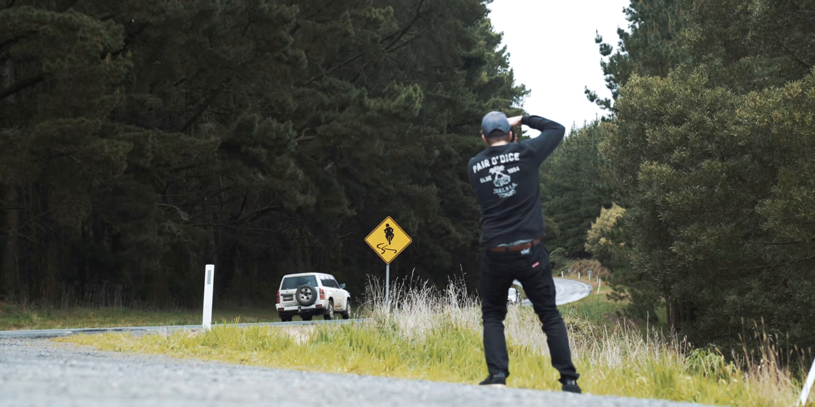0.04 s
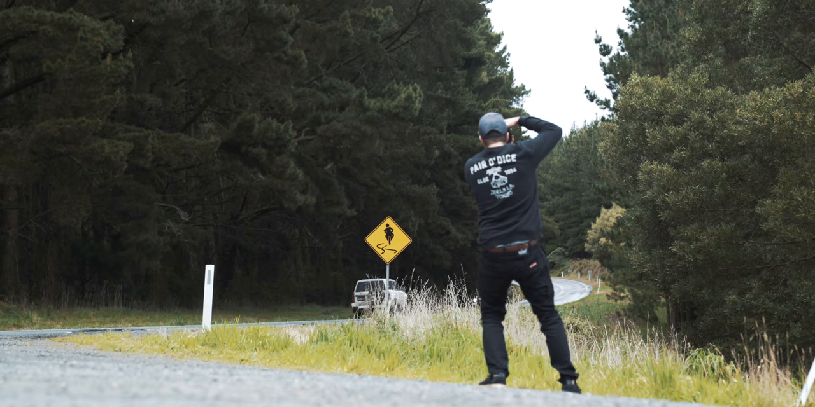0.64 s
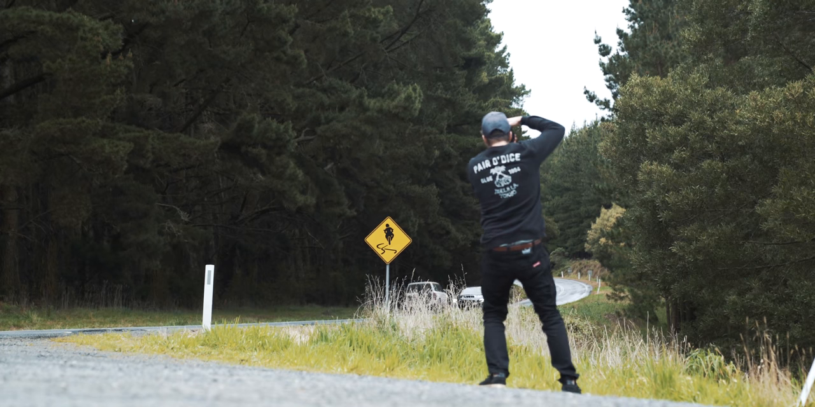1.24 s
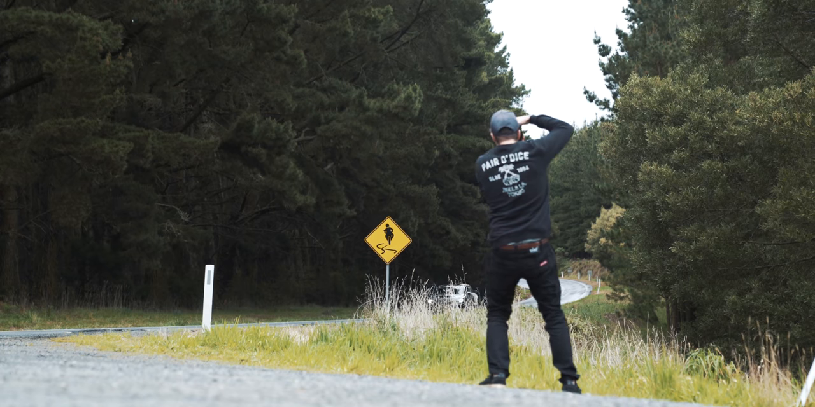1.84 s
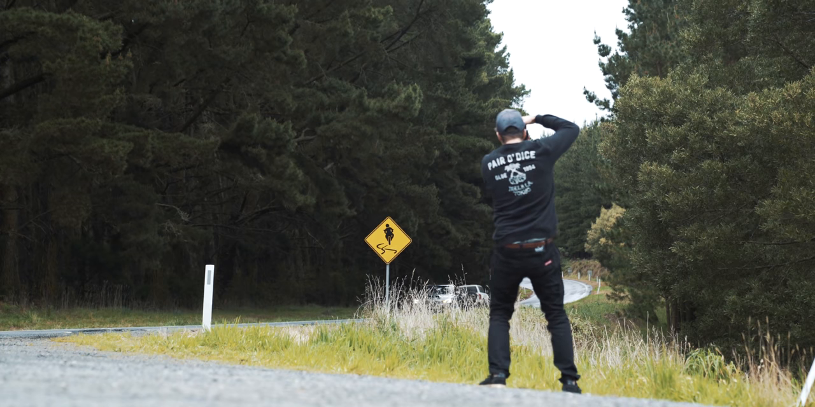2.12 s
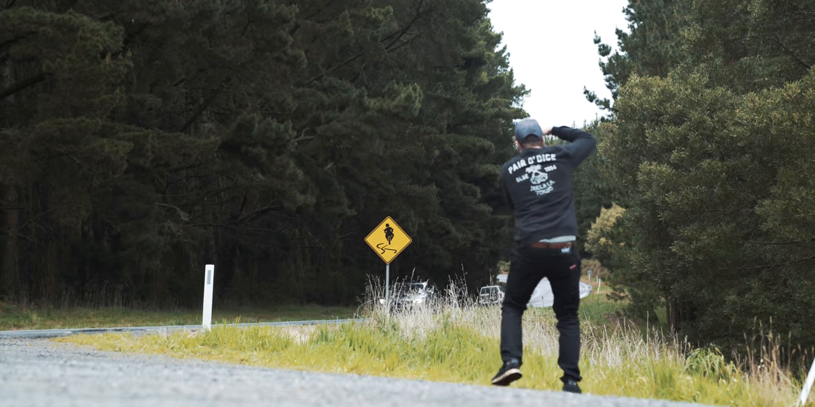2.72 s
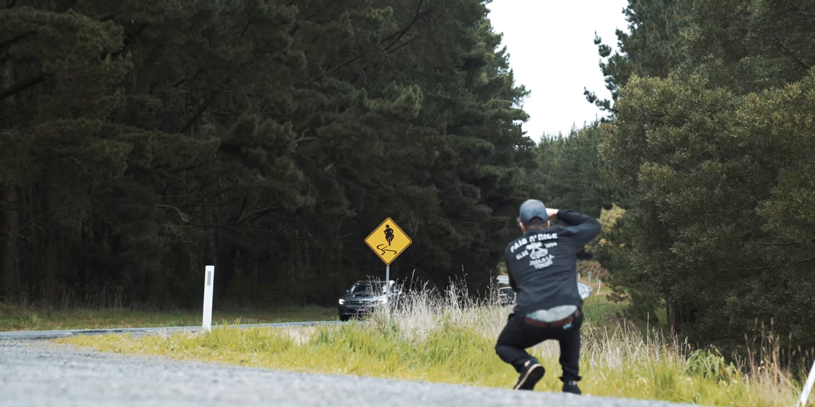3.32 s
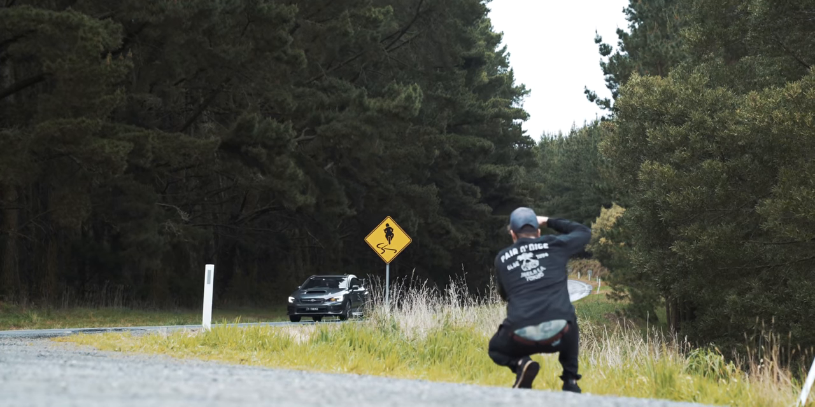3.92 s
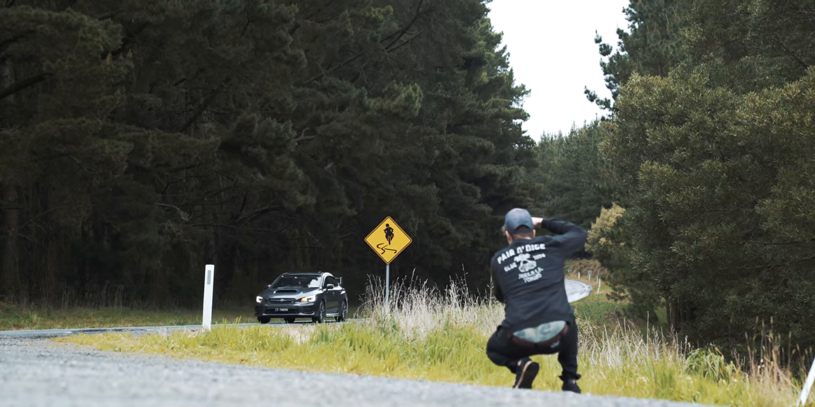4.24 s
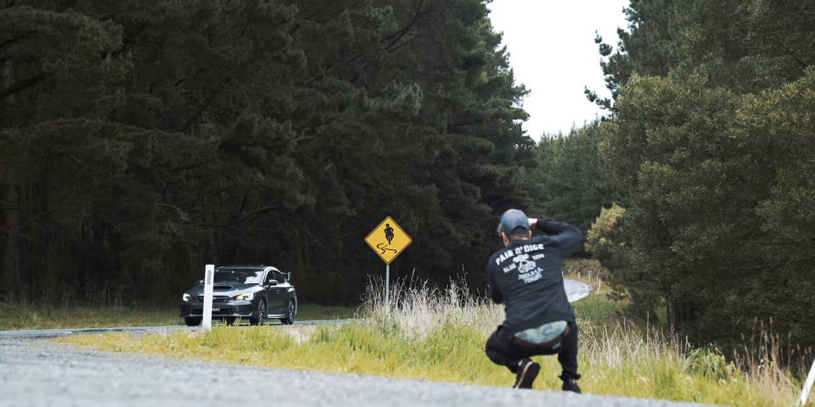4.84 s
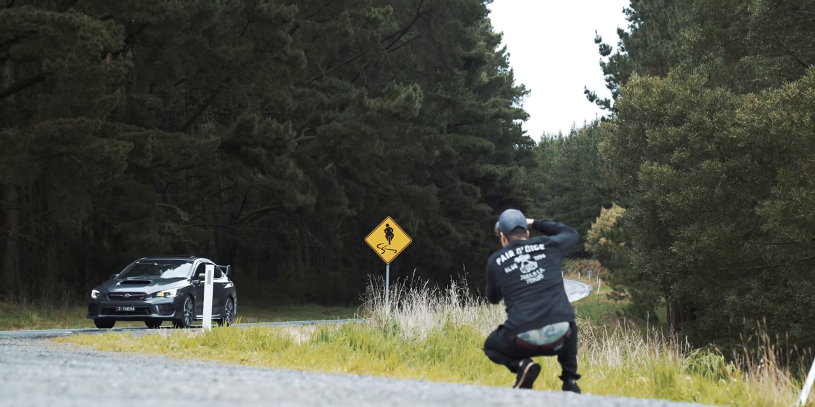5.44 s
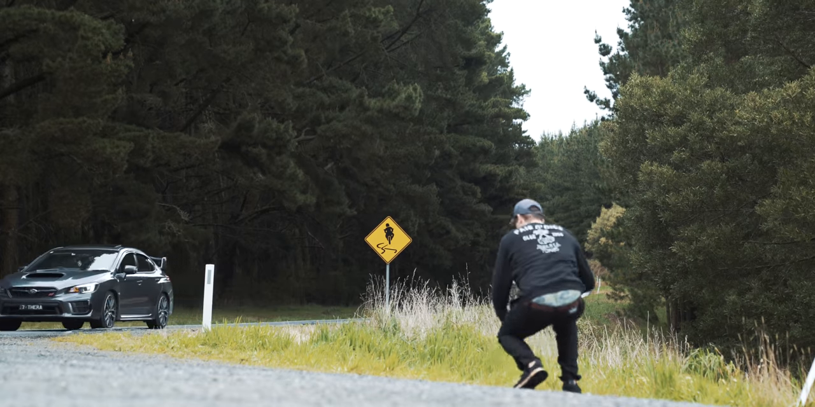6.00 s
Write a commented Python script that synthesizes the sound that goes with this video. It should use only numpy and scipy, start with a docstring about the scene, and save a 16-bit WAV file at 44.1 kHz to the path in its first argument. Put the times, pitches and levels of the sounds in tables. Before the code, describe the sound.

On a wet forest road, a four-wheel drive hums away and its tyre noise fades. An approaching car's low, uneven exhaust burble grows louder, sinks almost to idle, then revs up for a lower gear near the end, with tyre roar and faint spray. Wind bumps the roadside microphone twice midway. There are a few light scuffs of grit, and a small bird calls faintly three times at the end.

```python
"""A flat-four saloon burbles nearer on a wet forest road, drops to a near idle and revs for a lower gear. Its
uneven exhaust pulses ring the pipe, while a six-cylinder four-wheel drive hums away round the bend. Both cars
roar on their tyres, throw fine spray and rumble. Wind bumps the microphone twice, grit on the verge rustles,
scuffs and snaps, and a small bird calls three times over the rush of the forest."""
import sys
import numpy as np
from scipy import signal
from scipy.fft import rfft, irfft
from scipy.io import wavfile
from scipy.ndimage import uniform_filter1d

SR = 44100
rng = np.random.default_rng(int(sys.argv[2]) if len(sys.argv) > 2 else 0)


def generate_wav(signal):
    """Clip the signal to [-1, 1] and save it as 16-bit WAV at the path in sys.argv[1]."""
    frames = np.transpose(np.atleast_2d(signal))
    scaled = np.clip(frames, -1, 1) * 32767
    pcm = np.round(scaled).astype(np.int16)
    wavfile.write(sys.argv[1], SR, pcm)


N = 267642
T = np.arange(N) / SR


# Rev curve, down to a near idle and up again: t/s, engine cycle rate f/Hz
ENGINE_REVS = [(0.0, 14.92), (1.2, 14.82), (2.3, 14.27), (3.05, 13.4), (3.48, 8.5), (3.85, 8.05),
               (4.3, 8.98), (4.91, 8.06), (5.15, 10.75), (5.84, 16.77), (6.07, 16.92)]
# Load on the exhaust (coasting, a throttle blip, engine braking): t/s, level/dB
ENGINE_LOAD = [(4.5, 1), (4.93, -2.5), (5.28, -3.5), (5.33, 0), (5.56, 2.5), (5.64, -6.5)]
# Exhaust resonances: f/Hz, width/Hz, relative level/dB
EXHAUST_MODES = [(97.6, 22.7, 0), (139, 14.4, -4), (245, 24, -16), (285.5, 31.5, -18)]

def saloon(burble_db=-15.5, boom_db=-22, boom_hz=63.6, muffler_hz=154, bend_loss_db=7.5):
    """Firing pulses ring the exhaust: low modes leave through the muffler, high ones sing in its shell."""
    cycle_hz, load_db = curve(ENGINE_REVS), curve(ENGINE_LOAD)
    pulses = flat_four_pulses(cycle_hz, load_db)
    muffled = signal.sosfilt(signal.butter(8, muffler_hz, fs=SR, output="sos"), pulses)
    muffled = signal.sosfilt(signal.butter(2, muffler_hz / 2, "high", fs=SR, output="sos"), muffled)
    shell = pulses * undb(np.interp(T, [2, 5], [-9, 0]))  # opens up as the car nears
    burble = 0
    for hz, width, db in EXHAUST_MODES:
        drive = muffled if hz < muffler_hz else resonate(shell, hz, 2 * width)
        burble += undb(db) * resonate(drive, hz, width)
    # the lowest mode booms on the firing rate when revved, on twice that near idle
    boom = resonate(resonate(pulses, boom_hz, 18), boom_hz, 30)
    # trees on the bend mask the exhaust at first; the deep boom gets round them more easily
    bend_db = np.interp(T, [.72, 1.71], [-bend_loss_db, 0])
    burble_gain = undb(burble_db + exhaust_db(cycle_hz, db_per_octave=5) + bend_db + load_db)
    boom_gain = undb(boom_db + exhaust_db(cycle_hz, db_per_octave=15.5) + .32 * bend_db)
    return level_out(burble) * burble_gain + level_out(boom) * boom_gain


def flat_four_pulses(cycle_hz, load_db, header_lag_s=.0021, accent_db=3.8, scatter_db=1.4):
    """Each bank fires twice in turn; one bank's longer header delays its pulses, making the burble."""
    firing_phase = 4 * (np.cumsum(cycle_hz) / SR + .44)
    firings = np.arange(np.ceil(firing_phase[0]), firing_phase[-1])
    long_bank = firings // 2 % 2
    fired_s = np.interp(firings, firing_phase, T)
    lumpiness = np.interp(fired_s, [5.6, 5.75], [1, .5])  # smoother once the lower gear bites
    arrival_s = fired_s + header_lag_s * long_bank * lumpiness
    # an open throttle sets the two banks further apart in level
    bank_db = accent_db + .9 * np.maximum(np.interp(fired_s, T, load_db), 0)
    punch = undb(lumpiness * (bank_db * long_bank + scatter_db * rng.standard_normal(len(firings))))
    return np.bincount((arrival_s * SR).astype(int), punch, N)[:N]


def exhaust_db(cycle_hz, db_per_octave, approach_share=.42):
    """The exhaust swells with the revs; it points backwards, so it gains only a share of the approach."""
    return db_per_octave * np.log2(cycle_hz / cycle_hz[0]) + approach_share * approach_db()


def approach_db(speed_m_s=12.97, passes_s=6.4, closest_m=14.6):
    """The saloon's level against its closest point, falling as 1 / distance."""
    distance_m = np.hypot(speed_m_s * (T - passes_s), closest_m)
    return -20 * np.log10(distance_m / closest_m)


# Partials of the six-cylinder hum: multiple of the engine cycle, relative level/dB
HUM_PARTIALS = [(6, -1.5), (8, -12), (11, -5), (12, 0.5), (14, -11.5)]

def four_wheel_drive(level_db=-35.5, fade_db_per_s=1.5, waver_db=3, hidden_s=2.9, fade_out_s=.36):
    """The departing engine's hum creeps up in pitch, wavers and is lost behind the trees."""
    cycle_hz = (201 + 2.95 * T) / 12  # the strongest partial, the 12th, starts at 201 Hz
    cycles = np.cumsum(cycle_hz) / SR
    hum = 0
    for order, db in HUM_PARTIALS:
        hum += undb(db + waver_db * wander(14)) * np.sin(2 * np.pi * (order * cycles + rng.random()))
    in_view = np.clip((hidden_s - T) / fade_out_s, 0, 1)
    return np.sqrt(2) * hum * undb(level_db - fade_db_per_s * T) * in_view


# Tyre tone of the departing car: f/Hz, relative level/dB
DEPARTING_TYRE_EQ = [(350, -1), (500, 1.5), (720, 6.5), (900, 3.5), (1100, 1), (1400, -2.5), (2000, -7),
                     (2600, -12.5), (3700, -14), (4700, -32.5)]
# Tyre tone of the saloon: f/Hz, relative level/dB
SALOON_TYRE_EQ = [(350, -9.5), (450, -6.5), (600, -6.5), (720, -2.5), (900, -3.5), (1100, -0.5),
                  (1500, -11.5), (2000, -21), (2600, -25.5), (3700, -38.5), (4700, -47.5)]

def tyres(away_db=-26, near_db=-26, scattered_db=-39, flutter_db=.44):
    """Tread roar crossfades from the car that leaves to the car that comes."""
    leaving = colour(noise(), DEPARTING_TYRE_EQ) * undb(away_db + departure_db())
    coming = colour(noise(), SALOON_TYRE_EQ) * np.hypot(undb(near_db + approach_db()), undb(scattered_db))
    return (leaving + coming) * undb(flutter_db * wander(20))


def departure_db(fade_db_per_s=5.3):
    """The four-wheel drive's road noise fades as it leaves."""
    return -fade_db_per_s * T


def both_cars(away_db, near_db, steady_db):
    """Power sum of the departing car, the nearing car and a steady share scattered by the forest."""
    leaving, coming = undb(away_db + departure_db()), undb(near_db + approach_db())
    return np.sqrt(leaving ** 2 + coming ** 2 + undb(steady_db) ** 2)


# Sizzle of the tyre spray: f/Hz, relative level/dB
SPRAY_EQ = [(2500, -25.5), (4000, -12), (5600, -3.5), (8000, -6.5), (10500, -13), (15500, -19.5)]

def spray(drop_spread_db=2, mist_db=-63):
    """Droplets hiss off the tyres; the finest mist carries only once the saloon is close."""
    drops = noise() * undb(drop_spread_db * rng.exponential(size=N))
    hiss = colour(drops, SPRAY_EQ) * both_cars(away_db=-54.5, near_db=-57.5, steady_db=-63.5)
    flicker = undb(.57 * wander(18))
    mist = colour(noise(), [(9000, -7), (12000, -1), (15500, -6)]) * undb(mist_db)
    return hiss * flicker + mist * np.interp(T, [5.2, 5.8], [0, 1])


# Low end of the car bodies: f/Hz, relative level/dB
RUMBLE_EQ = [(20, -1), (45, -2.5), (80, 0), (130, 3.5), (190, -9), (280, -3.5), (380, -13), (600, -19)]

def body_rumble():
    """Both car bodies rumble under the tyre roar."""
    return colour(noise(), RUMBLE_EQ) * both_cars(away_db=-30, near_db=-23, steady_db=-28)


# Gust cues: at full strength t/s, hold/s, level/dB
GUST_CUES = [(2.954, 0.16, -15.5), (3.45, 0.2, -14.5)]
# Thud of wind on the microphone: f/Hz, relative level/dB
GUST_EQ = [(12, -12.5), (24, -5.5), (42, -6.5), (65, -13.5), (120, -27.5), (300, -45)]

def gusts(attack_s=.047, release_s=.1):
    """Wind bumps the microphone: each deep gust swells, holds and dies away."""
    envelope = 0
    for start, hold, db in GUST_CUES:
        rise = np.minimum(T - start, 0) / attack_s
        fall = np.maximum(T - start - hold, 0) / release_s
        envelope += undb(db) * np.exp(rise - fall)
    return colour(noise(), GUST_EQ) * envelope


# Rustles, scuffs and snaps on the verge: peak t/s, level/dB, centre f/Hz, Gaussian width/s
VERGE_CUES = [(.59, -54.5, 8000, 0.027), (2.94, -63, 9000, .02), (2.991, -37, 2920, 0.0017),
              (3.004, -42, 3180, 0.0063), (3.0, -62, 8500, 0.015), (3.269, -36.5, 2400, 0.0014),
              (3.935, -64.5, 11000, .005), (5.547, -35.5, 3430, 0.0014)]

def verge_rustles(width_share=.46):
    """Small rustles, scuffs and snaps of grit on the verge, in short bursts of band-passed noise."""
    out = np.zeros(N)
    for peak_s, db, hz, width_s in VERGE_CUES:
        band = resonate(resonate(noise(), hz, width_share * hz), hz, width_share * hz)
        out += unit_rms(band) * undb(db) * np.exp(-.5 * ((T - peak_s) / width_s) ** 2)
    return out


# Bird calls, each lower than the last: t/s, starting f/Hz, slur level/dB, flick level/dB
BIRD_CALLS = [(5.376, 5420, -49, -42), (5.678, 4780, -43.5, -46), (5.905, 4120, -44, -47)]

def bird(slur_s=.042, flick_s=.026, waver=.008, rasp=.062, echo_db=-7, echo_t60_s=.76):
    """Each call is a thin falling slur that ends in a raspy downward flick, scattered by the trunks."""
    calls = np.zeros(N)
    for start, start_hz, slur_db, flick_db in BIRD_CALLS:
        slur = np.clip((T - start) / slur_s, 0, 1)
        flick = np.clip((T - start - slur_s) / flick_s, 0, 1)
        fall_octaves = .085 * slur + .22 * np.sqrt(flick)
        jitter = (waver + rasp * (flick > 0)) * wander(900)
        hz = start_hz * 2 ** -fall_octaves * (1 + jitter)
        slur_swell = undb(slur_db) * np.sqrt(np.abs(np.sin(np.pi * slur)))
        flick_swell = undb(flick_db) * np.sin(np.pi * flick)
        calls += (slur_swell + flick_swell) * np.sin(2 * np.pi * np.cumsum(hz) / SR)
    trunks = noise() * np.exp(-np.log(1000) * T / echo_t60_s)
    echo = signal.fftconvolve(calls, trunks / np.linalg.norm(trunks))[:N]
    return calls + undb(echo_db) * echo


# Forest ambience: f/Hz, relative level/dB
FOREST_EQ = [(200, 2.5), (700, -15.5), (1200, 1.5), (2000, -2.5), (2800, -11.5), (3800, -12.5),
             (4700, -23.5), (8000, -43.5)]

def forest(level_db=-38):
    """The forest lays a soft, nearly steady rush under everything."""
    return colour(noise(), FOREST_EQ) * undb(level_db + .5 * wander(3.82))


def undb(db):
    """Decibels to gain."""
    return 10 ** (np.asarray(db) / 20)


def unit_rms(x):
    """Scale to rms 1."""
    return x / np.sqrt(np.mean(x ** 2))


def level_out(x, window_s=.3):
    """Ride the running rms to about 1, leaving the single beats alone."""
    return x / np.sqrt(uniform_filter1d(x ** 2, int(window_s * SR)) + 1e-18)


def curve(points):
    """An automation curve through (t/s, value) points."""
    return np.interp(T, *np.transpose(points))


def colour(x, eq):
    """EQ through (f/Hz, level/dB) points, rolling off 24 dB per octave outside them; rms 1."""
    hz, db = np.transpose(eq)
    octave = np.log2(np.maximum(np.arange(N // 2 + 1) * SR / N, 1))
    outside = np.maximum(np.log2(hz[0]) - octave, 0) + np.maximum(octave - np.log2(hz[-1]), 0)
    gain = undb(np.interp(octave, np.log2(hz), db) - 24 * outside)
    return unit_rms(irfft(rfft(x) * gain, N))


def resonate(x, hz, width_hz):
    """Two-pole resonance, gain 1 at the centre."""
    return signal.lfilter(*signal.iirpeak(hz, hz / width_hz, fs=SR), x)


def noise():
    """White noise, rms 1."""
    return rng.standard_normal(N)


def wander(rate_hz):
    """A modulator gliding between random values, rms 1."""
    hold = int(SR / rate_hz)
    stepped = np.repeat(rng.standard_normal(N // hold + 1), hold)
    return unit_rms(uniform_filter1d(stepped, hold)[:N])


def scene():
    """The mono mix at one microphone on the verge."""
    cars = saloon() + four_wheel_drive() + tyres() + spray() + body_rumble()
    return (cars + gusts() + verge_rustles() + bird() + forest())[None]


def record(dry):
    """Short fades at both ends and a steep high cut."""
    fade_s, high_cut_hz = .004, 15700
    edge_s = np.minimum(T, T[-1] - T)
    fade = np.sin(np.pi / 2 * np.minimum(edge_s / fade_s, 1)) ** 2
    return signal.sosfilt(signal.ellip(10, .2, 80, high_cut_hz, fs=SR, output="sos"), dry * fade)


dry = scene()
out = record(dry)
generate_wav(out)
```